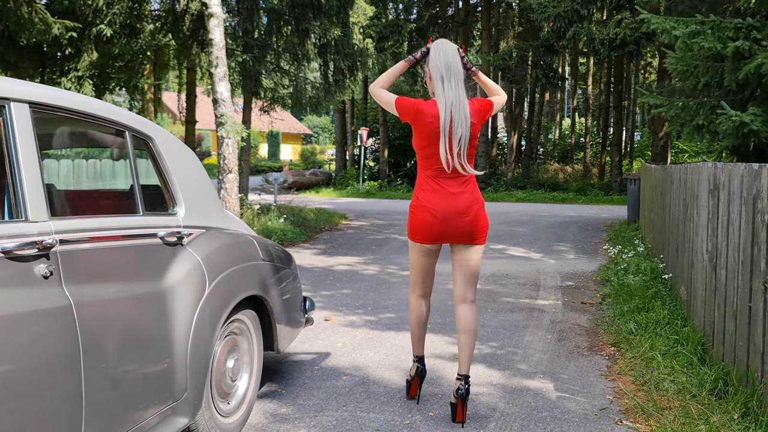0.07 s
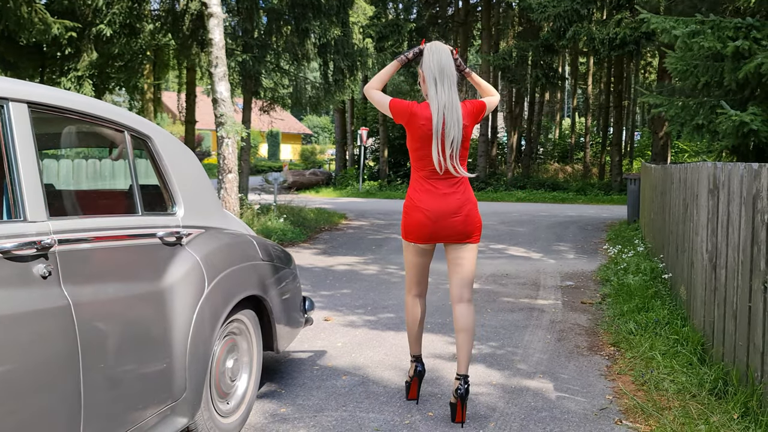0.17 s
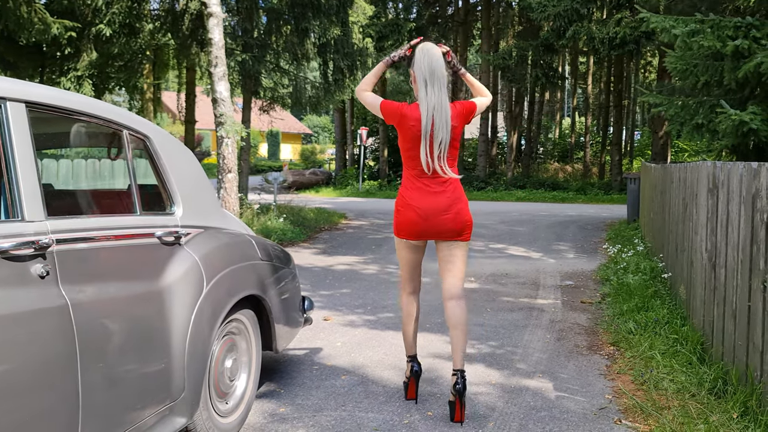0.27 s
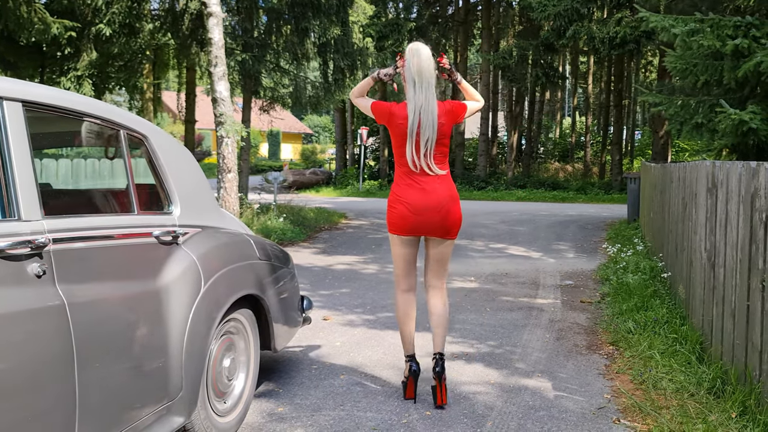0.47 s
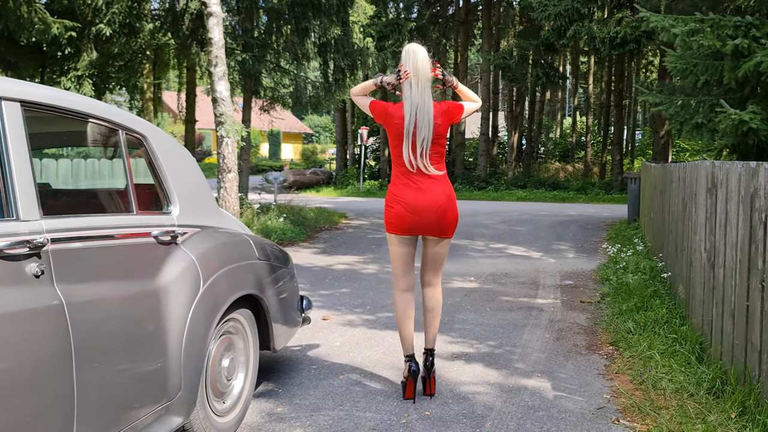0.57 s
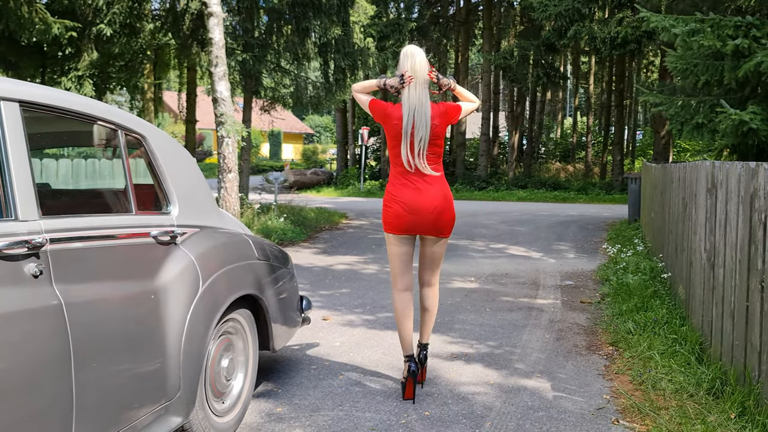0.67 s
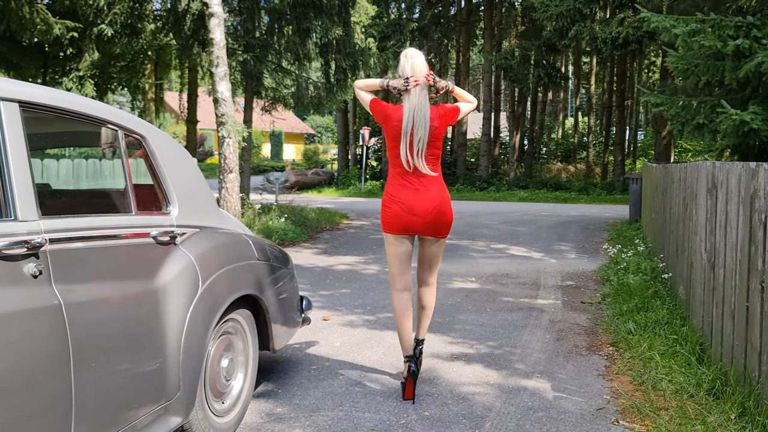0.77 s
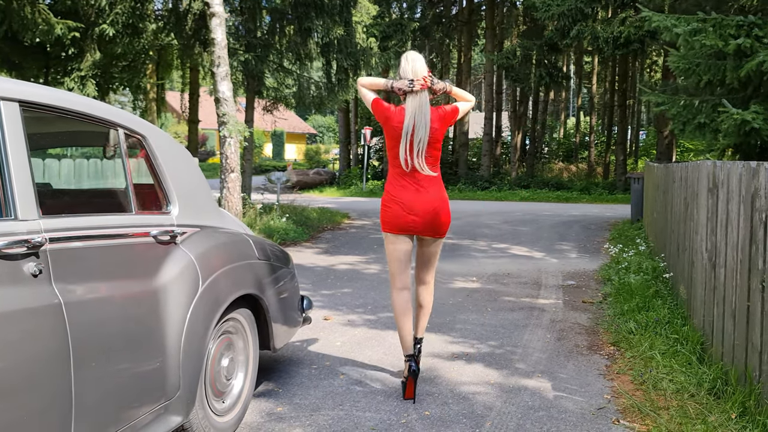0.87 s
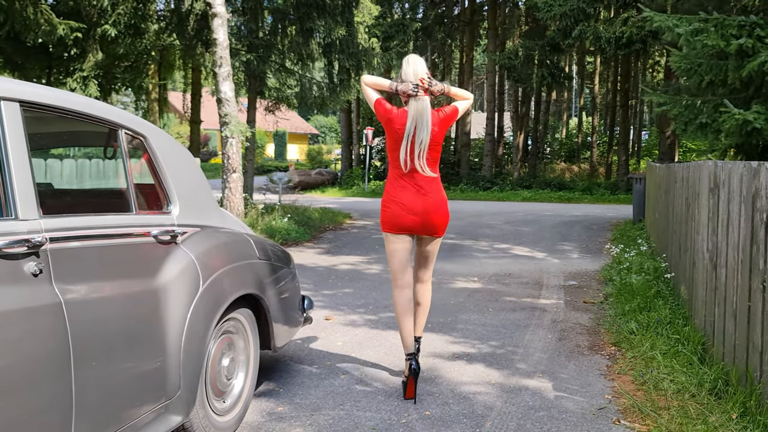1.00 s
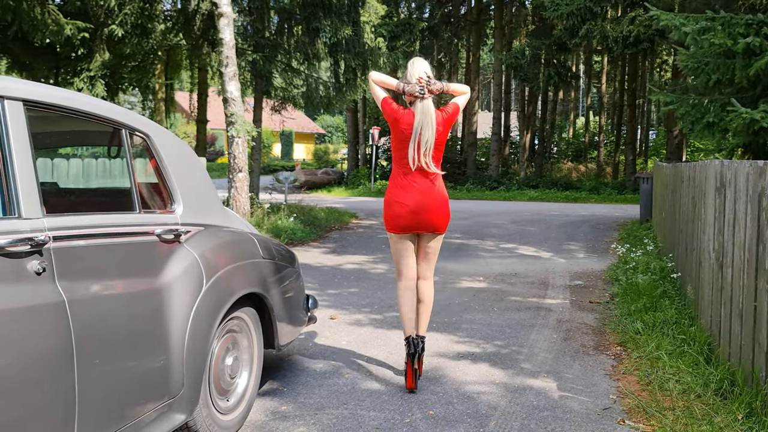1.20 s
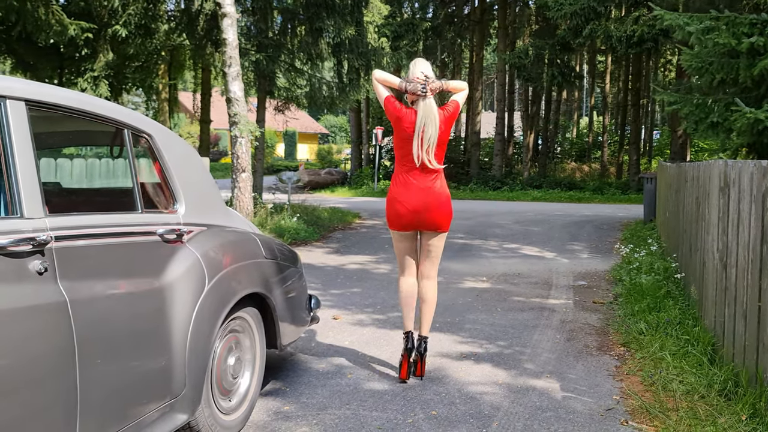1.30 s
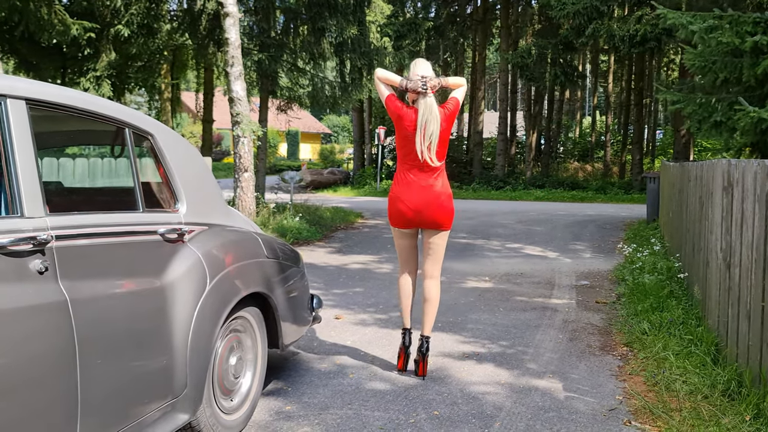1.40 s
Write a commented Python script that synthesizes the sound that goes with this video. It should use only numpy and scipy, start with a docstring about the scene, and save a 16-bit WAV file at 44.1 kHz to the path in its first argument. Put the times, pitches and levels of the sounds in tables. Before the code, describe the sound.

Sharp, hollow heel steps recede along a paved lane among trees, over faint birdsong and rumble

```python
"""From the start a low rumble and the hush of leaves, with a wavering hum and songbirds far off in a wood.
Soon a scuff, then platform high heels walk away on asphalt beside a parked car: each strike is fainter.
A heel grinds on grit and rings the hollow sole; small scuffs lie between. A far clank follows the first step;
around the second the grit drags and snaps, until the third. Car, fence and trees echo the steps as decaying
noise. Two spaced microphones: direct steps, birds and clank reach the right one first."""
import sys
import numpy as np
from scipy import signal
from scipy.fft import rfft, irfft
from scipy.io import wavfile
from scipy.ndimage import uniform_filter1d

SR = 44100
rng = np.random.default_rng(int(sys.argv[2]) if len(sys.argv) > 2 else 0)


def linear_from_db(decibels):
    """Turn decibels (scalar or array-like) into linear amplitude factors; 0 gives 1."""
    return 10 ** (np.asarray(decibels, float) / 20)


def inscribe(sig):
    """Save sig as 16-bit PCM at rate SR to the path in sys.argv[1].

    A 1-D sig is mono; a 2-D sig holds one channel per row.
    Samples are clipped to [-1, 1] before scaling.
    """
    pcm = np.round(np.clip(np.atleast_2d(sig).T, -1, 1) * 32767)
    wavfile.write(sys.argv[1], SR, pcm.astype(np.int16))


N = 63945
T = np.arange(N) / SR
LAG_S = 0.00048  # direct sound reaches the left microphone this much later


def read(table, hz):
    """Reads a (frequency, value) table on a log-frequency axis."""
    table = np.array(table, float)
    return np.interp(np.log(np.maximum(hz, 1)), np.log(table[:, 0]), table[:, 1])


def colour(x, table, share=1):
    """Filters by a (frequency, dB) table, its dB scaled by share."""
    hz = np.fft.rfftfreq(x.shape[-1], 1 / SR)
    return irfft(rfft(x) * linear_from_db(share * read(table, hz)), x.shape[-1])


def unit(x):
    """Scales to rms 1."""
    return x / np.sqrt(np.mean(x ** 2))


def noise_through(order, hz, kind, shape=N):
    """White noise through a Butterworth filter."""
    sos = signal.butter(order, hz, kind, fs=SR, output="sos")
    return signal.sosfilt(sos, rng.standard_normal(shape))


def walk(rate):
    """Smooth random wander of rms 1, built from `rate` random values a second."""
    hold = int(SR / rate)
    steps = np.repeat(rng.standard_normal(N // hold + 1), hold)
    return unit(uniform_filter1d(uniform_filter1d(steps, hold), hold)[:N])


def hump(start, rise, fall):
    """Envelope that rises, then dies away; rise and fall are time constants in seconds."""
    u = np.maximum(T - start, 0)
    return (1 - np.exp(-u / rise)) * np.exp(-u / fall)


def ring(x, hz, t60):
    """One damped mode struck by x; it falls 60 dB in t60 seconds."""
    pole = np.exp(2j * np.pi * hz / SR - np.log(1000) / (t60 * SR))
    return signal.lfilter([1], [1, -pole], x).imag


def whistle(hz):
    """Sine that follows a moving frequency."""
    return np.sin(2 * np.pi * np.cumsum(hz) / SR)


def tail(t60, band=None):
    """Echo as decaying stereo noise of mean energy 1 per channel, optionally in a band."""
    noise = noise_through(2, band, "bandpass", (2, N)) if band else rng.standard_normal((2, N))
    noise = noise * np.exp(-np.log(1000) * T / t60) * np.minimum(T / 0.0035, 1) ** 2
    return noise / np.sqrt(np.sum(noise ** 2) / 2)


def tilt(left_db):
    """Left and right gains whose difference is left_db."""
    return linear_from_db(np.array([[left_db], [-left_db]]) / 2)


# colour of the rumble and leaves: (frequency [Hz], relative level [dB per Hz])
AIR_COLOUR = [(12, -65), (20, -3.5), (65, 4), (146, -17), (310, -19), (433, -15), (542, -19), (697, -16.5),
              (2190, -28), (3160, -24), (6350, -35), (9390, -55), (16000, -51)]


def rumble_and_leaves():
    """Noise in half-octave bands that wander together and apart; the bass is mostly shared by both sides."""
    out, swell = 0, walk(7.4)
    for hz in 22 * 2 ** np.arange(0, 9.6, 0.5):
        band = [hz / 2 ** 0.25, hz * 2 ** 0.25]
        mid, side = noise_through(2, band, "bandpass", (2, N))
        width = np.clip(hz / 136, 0.4, 1)
        stereo = mid + width * side * np.array([[1], [-1]])
        out = out + linear_from_db(0.27 * swell + 0.4 * walk(13.8)) * stereo
    return unit(colour(out, AIR_COLOUR)) * linear_from_db(-59.5)


def hum():
    """A 50 Hz sine whose pitch and level waver."""
    return linear_from_db(-65.5 + 1.7 * walk(36)) * whistle(50 + 1.6 * walk(9.1))


def drone():
    """A low note, perhaps a far engine: a sine of wavering level that fades early."""
    hz, level_db, fade_s = 197, -72, 0.29
    fade = 1 / (1 + (T / fade_s) ** 8)
    return linear_from_db(level_db + 3.6 * walk(31)) * np.sin(2 * np.pi * hz * T) * fade


# far notes held throughout: (frequency [Hz], level [dB])
FAR_TONES = [(434.3, -74), (91.3, -71.5)]


def far_tones():
    """Sines that waver in pitch and level."""
    out = 0
    for hz, db in FAR_TONES:
        out = out + linear_from_db(db + 5.8 * walk(19.96)) * whistle(hz * (1 + 0.01423 * walk(13)))
    return out


def air():
    """The steady bed of noise and low notes, 5 dB stronger on the left."""
    return (rumble_and_leaves() + hum() + drone() + far_tones()) * tilt(5)


# bird notes, levels ahead of the echo and the tilt:
# (time [s], length [s], start frequency [Hz], end frequency [Hz], level [dB], warble rms [Hz])
BIRD_NOTES = [(-.06, 0.076, 6072, 6280, -48.5, 61.6), (-.06, 0.038, 4273, 4360, -55.5, 211),
              (-.05, 0.081, 3400, 3400, -70, 59.5), (-.03, 0.073, 5800, 5800, -65, 39.8),
              (0.039, 0.022, 6270, 6870, -54.5, 62), (0.064, 0.048, 7320, 6370, -62, 299),
              (0.093, 0.037, 6460, 6450, -62.5, 146), (0.459, 0.028, 2968, 3150, -55, 57.3),
              (0.465, 0.035, 3192, 3640, -51.5, 81), (0.478, 0.026, 3870, 4400, -59, 197),
              (0.509, 0.044, 4900, 5800, -62, 500), (0.515, 0.017, 6900, 7000, -70.5, 152),
              (0.588, 0.036, 6270, 5470, -61, 78), (0.614, .05, 4190, 3600, -49, 60.3),
              (0.643, .06, 3716, 2747, -50.5, 153), (0.692, 0.065, 3900, 3800, -57, 146.7),
              (0.729, 0.04, 3150, 3150, -54.5, 41.2), (0.82, 0.0372, 2890, 2490, -52, 81.6),
              (0.832, 0.022, 3250, 3686, -47, 83), (0.979, .07, 4880, 4226, -53, 400),
              (1.027, 0.072, 6390, 6130, -52, 50), (1.045, 0.033, 5500, 6000, -58, 82.3),
              (1.06, 0.041, 3474, 3360, -61.5, 100.3), (1.088, 0.046, 6360, 6900, -52.5, 97),
              (1.15, 0.044, 6500, 6170, -60.5, 96.8), (1.213, 0.027, 4780, 4316, -53, 313),
              (1.223, 0.027, 3250, 3150, -46.5, 30.7), (1.255, 0.019, 3157, 2560, -44, 81.4),
              (1.281, 0.074, 2350, 2180, -67, 50), (1.293, 0.061, 3226, 3250, -55.5, 29.8),
              (1.299, 0.018, 2450, 2505, -54.5, 79.8)]


def songbirds(t):
    """Gliding whistles, roughened by one fast random warble of pitch."""
    song = np.zeros(len(t))
    warble = np.resize(walk(770), len(t))
    for s, length, hz0, hz1, db, warble_hz in BIRD_NOTES:
        u = np.clip((t - s) / length, 0, 1)
        tone = whistle(hz0 + (hz1 - hz0) * u + warble_hz * warble)
        song = song + linear_from_db(db) * np.sin(np.pi * u) ** 0.5 * tone
    return song


# gritty ground: (frequency [Hz], relative level [dB per Hz])
GRIT_COLOUR = [(1180, -6.5), (2000, -15), (3250, -9), (3980, -21.5), (5630, -13.5), (12600, -24),
               (16000, -37)]


def grit_noise():
    """Grit crackles: noise with a random level at every sample, coloured."""
    return unit(colour(rng.standard_normal(N) * linear_from_db(5.4 * rng.standard_normal(N)), GRIT_COLOUR))


# light touches of the soles:
# (time [s], level ahead of doubling [dB], centre frequency [Hz], grit relative to the puff [dB])
SOLE_SCUFFS = [(0.154, -53, 287, -40), (0.71, -57, 400, -36), (0.827, -56, 266, -31),
               (0.836, -54.5, 76, -63), (0.927, -58.5, 1204, 0), (0.977, -56.5, 150, -48),
               (1.095, -54.5, 610, -12), (1.184, -55, 1400, -11), (1.436, -48.5, 258, -47)]


def scuffs(grit):
    """Each touch is a puff of band noise with some grit; lower puffs last longer."""
    out = np.zeros(N)
    for s, db, hz, grit_db in SOLE_SCUFFS:
        puff = unit(noise_through(2, [hz / 1.62, hz * 1.68], "bandpass"))
        envelope = hump(s, 0.0037, 0.0042 + 0.91 / hz)
        out = out + linear_from_db(db) * envelope * 2 * (puff + linear_from_db(grit_db) * grit)
    return out


# heel strikes, levels relative:
# (time [s], level [dB], foot 0 or 1, grit level [dB], skim level [dB])
HEEL_STRIKES = [(0.1998, -16.5, 1, -9, -36), (.9725, -27, 1, -10, -38.5), (1.441, -44.5, 1, -4, -26)]
# the weight lands in a few knocks after the tip touches: (delay [s], relative level [dB])
WEIGHT_KNOCKS = [(.0002, -9), (.0021, 0.5), (.0040, 2), (.0049, 1.5), (.0085, -9), (0.0115, -17.5)]
# modes of the shoes: (frequency [Hz], level on foot 0 [dB], level on foot 1 [dB], t60 [s])
SHOE_MODES = [(373, -13, -16, 0.029), (608, -4, -27, 0.098), (704, -9, -4.5, 0.023),
              (855, -14, -5.5, 0.023), (931, -12, -5, 0.021), (1108, -9, -18, 0.014), (1486, -4, -9, 0.026),
              (1677, -3, -1, 0.018), (1880, -7, -9, 0.026), (2033, -10, -19.5, 0.066),
              (2510, -17, -15, 0.018), (3150, -32, -48, 0.28), (3250, -9, -10, 0.01),
              (3623, -16, -23, 0.015), (4400, -19, -21, 0.01), (5800, -22, -13, 0.01),
              (6900, -23, -17.5, 0.012)]


def heel_strikes(grit):
    """The heel skims, then chatters and knocks on the ground, ringing the hollow sole while grit cracks."""
    skim_s, roll_s, chatter_per_s, sole_cut_hz = 0.012, 0.0051, 1600, 342
    chatter = (rng.random(N) < chatter_per_s / SR) * rng.standard_normal(N)
    rasp = noise_through(3, 1200, "highpass")
    out = np.zeros(N)
    for s, db, foot, grit_db, skim_db in HEEL_STRIKES:
        push = linear_from_db(-8) * chatter * hump(s, 0.0014, roll_s)
        push = push + linear_from_db(skim_db) * rasp * (T > s - skim_s) * (T < s)
        for delay, knock_db in WEIGHT_KNOCKS:
            knock = np.maximum(1 - abs(T - s - delay) * SR, 0)  # a click placed between samples
            push = push + linear_from_db(knock_db) * knock
        sole = 0
        for k, (hz, *feet_db, t60) in enumerate(SHOE_MODES):
            sole = sole + (-1) ** k * linear_from_db(feet_db[foot]) * ring(push, hz, t60)  # signs alternate
        crack = linear_from_db(grit_db) * grit * hump(s, 0.00042, 0.0079)
        out = out + linear_from_db(db) * (sole / 2 + crack)
    sos = signal.butter(4, sole_cut_hz, "highpass", fs=SR, output="sos")
    return signal.sosfilt(sos, out)


# partials of the far clank, levels ahead of the echo and the tilt:
# (frequency [Hz], level [dB], t60 [s])
CLANK_PARTIALS = [(738.5, -49.5, 0.89), (843, -64, 0.7), (1040, -58.5, 0.49), (1400, -64.5, 0.41),
                  (1750, -70.5, 0.69), (1182, -55, 0.35), (1950, -72, 0.6), (2350, -67, 0.38),
                  (4700, -62.5, 0.63), (5000, -63, 0.42), (6500, -63.5, 0.42), (8340, -74.5, 0.15),
                  (9050, -80, .2)]


def far_clank(t):
    """Partials that swell briefly, then die away while their pitch wavers."""
    start_s, swell_s, waver_hz = 0.5827, 0.01, 9.52
    u = np.maximum(t - start_s, 0)
    out = 0
    for hz, db, t60 in CLANK_PARTIALS:
        envelope = (1 - np.exp(-u / swell_s)) * np.exp(-np.log(1000) * u / t60)
        waver = (waver_hz + 0.0061 * hz) * np.resize(walk(40.32), len(t))
        out = out + linear_from_db(db) * envelope * whistle(hz + waver)
    return out


# a foot drags over grit: (time [s], length [s], level ahead of the flutter [dB])
GRIT_DRAGS = [(0.907, 0.065, -72), (1.02, 0.23, -77), (1.222, 0.11, -71), (1.33, 0.38, -74.5)]


def drags():
    """Dragged sand hisses: treble noise that flutters in level under a rounded swell."""
    sand = noise_through(2, 5860, "highpass") * linear_from_db(3.4 * walk(60.94))
    swells = 0
    for s, length, db in GRIT_DRAGS:
        swells = swells + linear_from_db(db) * np.sin(np.pi * np.clip((T - s) / length, 0, 1)) ** 0.5
    return sand * swells


# single grains of grit snap: (time [s], level ahead of the envelope [dB])
GRAIN_SNAPS = [(.9245, -56), (.929, -51), (.934, -50)]


def snaps(grit):
    """Each grain is a very short burst of grit noise."""
    return grit * sum(linear_from_db(db) * hump(s, 0.0002, 0.00056) for s, db in GRAIN_SNAPS)


def shoes():
    """All the contacts of shoe and ground, in mono, sharing one grit noise."""
    grit = grit_noise()
    return scuffs(grit) + heel_strikes(grit) + drags() + snaps(grit)


# tone of the direct steps, of which each side takes a share: (frequency [Hz], full level [dB])
STEP_TONE = [(60, -36), (110, 7), (200, 7), (380, -2.5), (700, 12), (1290, 10), (2380, 10.5), (4400, 15.5),
             (8120, -5), (15000, 8)]
# echoes by band, levels ahead of scaling by bandwidth: (centre frequency [Hz],
# t60 near car and fence [s], near level [dB], t60 of the wood [s], wood level [dB])
ECHO_BANDS = [(400, 0.2, -18.5, 0.49, -5), (928, 0.055, -10.5, 0.42, -13.5), (2160, 0.094, -8.5, 0.63, -13),
              (4040, 0.033, -6, 0.39, -8.5), (8000, 0.074, -5.5, 0.3, -20.5), (13600, 0.1, -15, 0.31, -9)]


def ground(x):
    """Direct sound, later on the left, with quick echoes from car and fence and slow ones from the trees."""
    left = colour(np.interp(T - LAG_S, T, x), STEP_TONE, share=0.72)
    right = colour(x, STEP_TONE, share=0.048)
    direct = np.array([left, right])
    room = 0
    for hz, near_t60, near_db, far_t60, far_db in ECHO_BANDS:
        band = [hz / 1.57, min(hz * 1.75, 18000)]
        part = np.sqrt((band[1] - band[0]) / (SR / 2))
        room = room + part * (linear_from_db(near_db) * tail(near_t60, band) + linear_from_db(far_db) * tail(far_t60, band))
    return direct + np.array([signal.fftconvolve(d, r)[:N] for d, r in zip(direct, room)])


def through_trees():
    """Birds and clank, direct plus a decaying echo of the wood, 7 dB of gain in favour of the left."""
    pad = SR // 10  # a lead-in, so that notes and echoes already sound at the start
    t = np.arange(-pad, N) / SR
    song = songbirds(t) + far_clank(t)
    wet = np.array([signal.fftconvolve(song, r)[:N + pad] for r in tail(0.58)])
    direct = np.array([np.interp(t - LAG_S, t, song), song])
    return (wet + direct)[:, pad:] * tilt(7)


def scene():
    """The air, the birds and clank in the trees, and the steps."""
    return air() + through_trees() + ground(shoes())


def roll_off(x):
    """The treble ends steeply here."""
    return signal.sosfilt(signal.butter(12, 16130, fs=SR, output="sos"), x)


def record(dry):
    """The microphones drop the deepest bass, below 33 Hz."""
    sos = signal.butter(3, 33, "highpass", fs=SR, output="sos")
    mix = signal.sosfilt(sos, dry)
    return roll_off(mix)


dry = scene()
out = record(dry)
inscribe(out)
```